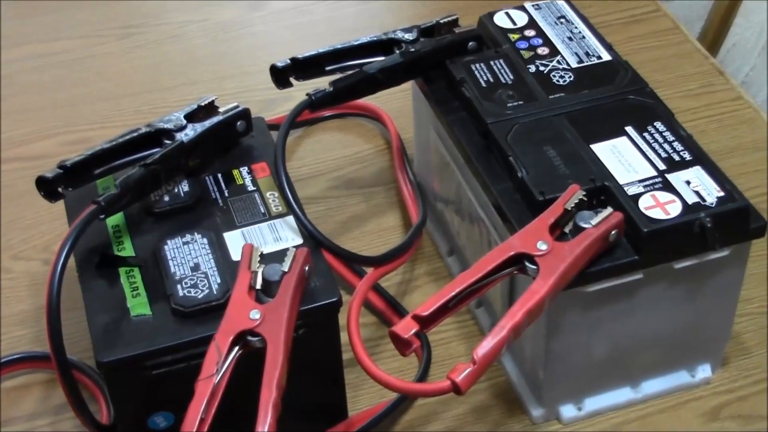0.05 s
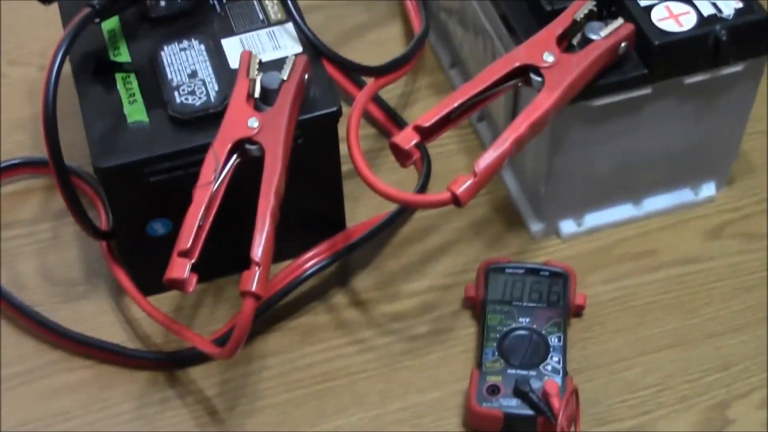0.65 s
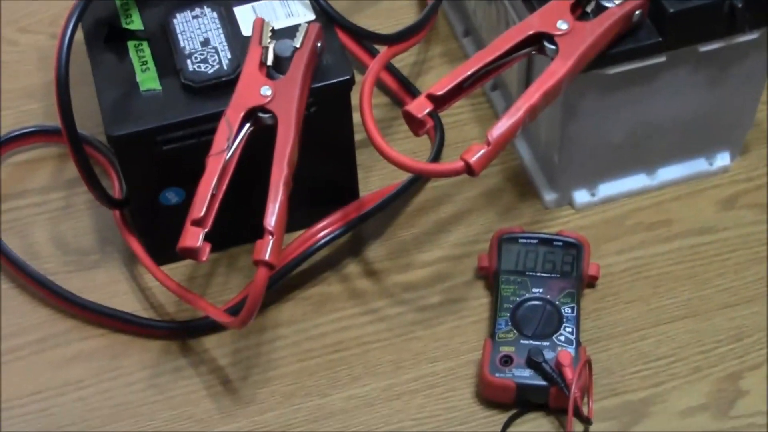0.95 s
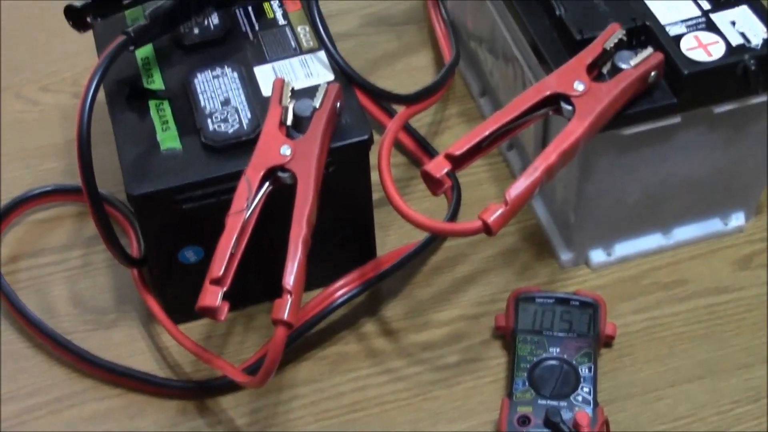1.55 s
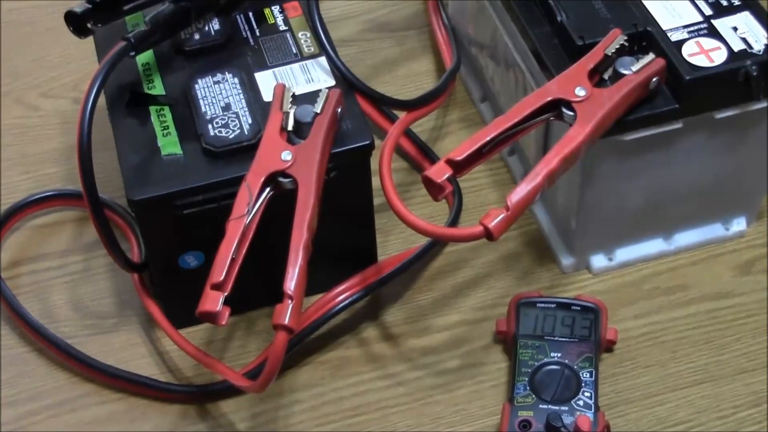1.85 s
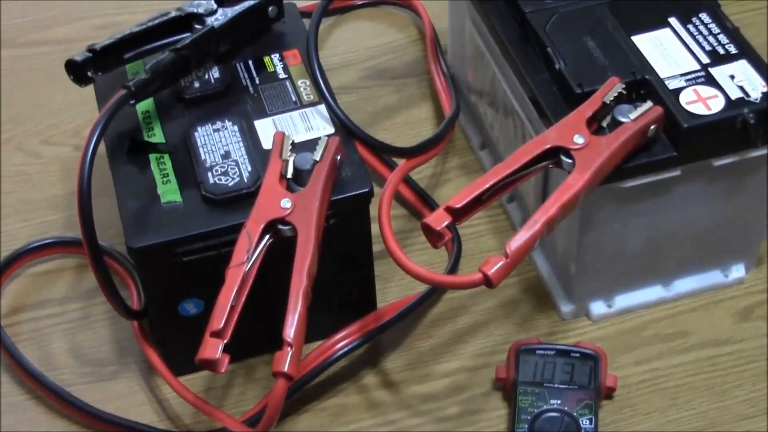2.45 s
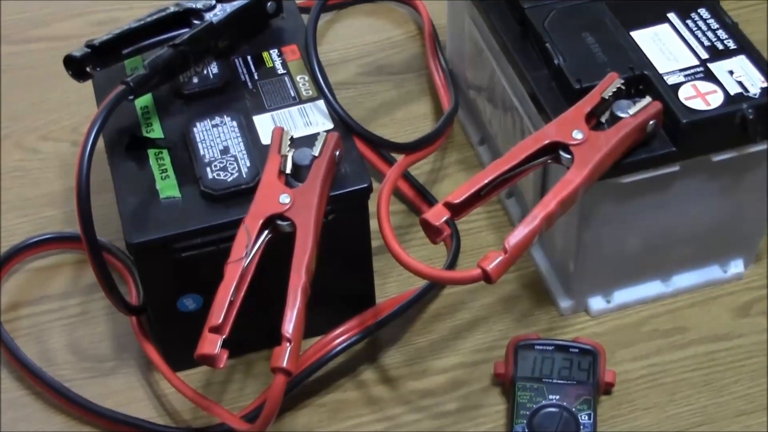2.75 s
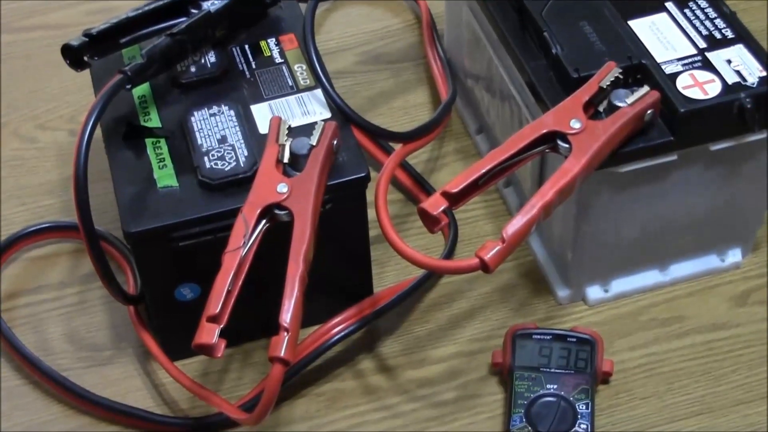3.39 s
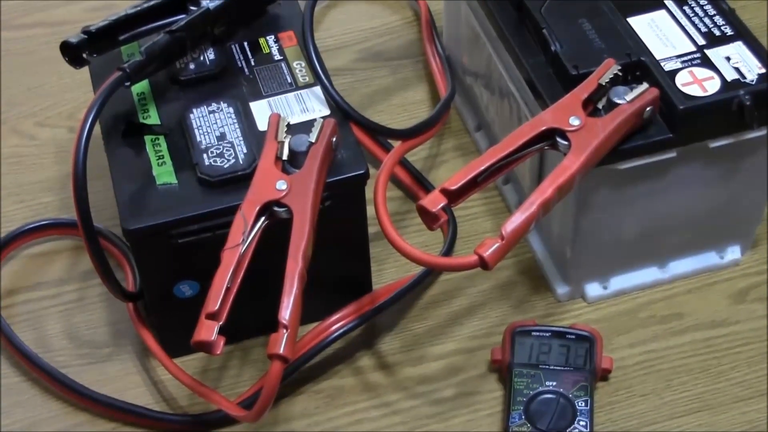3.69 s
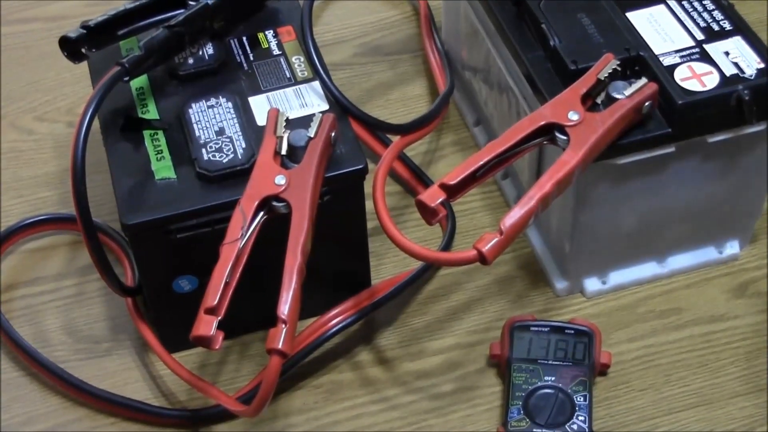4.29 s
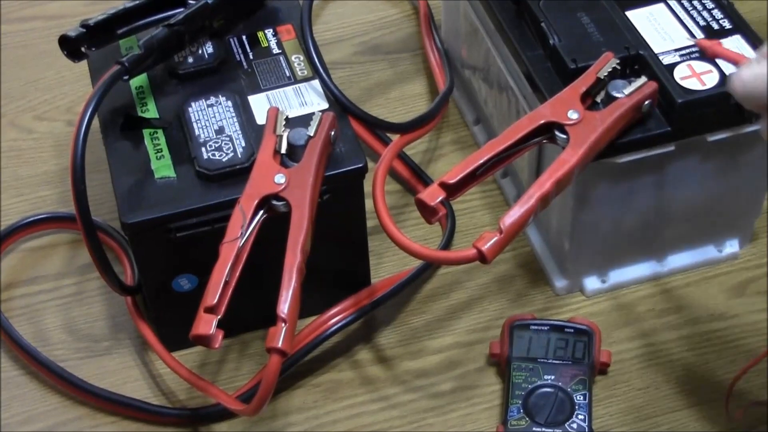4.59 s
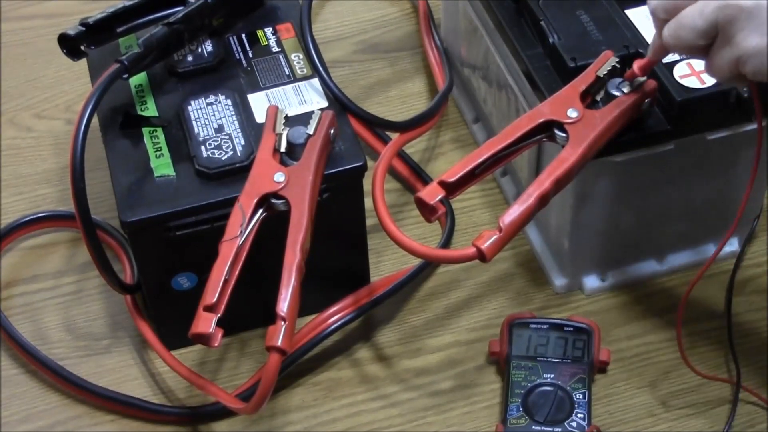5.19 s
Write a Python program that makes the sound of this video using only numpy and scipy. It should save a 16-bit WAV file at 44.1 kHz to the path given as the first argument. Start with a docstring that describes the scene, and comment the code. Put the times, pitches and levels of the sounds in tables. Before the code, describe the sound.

A multimeter clacks on wood amid close plastic knocks, then its test leads softly slide and tick in a small quiet room.

```python
"""A small quiet room, a stereo microphone near a wooden table where a multimeter is handled.
Right at the microphone, the camera's plastic mount sticks and slips in dry knocks as it is aimed.
Farther off, the meter clacks on the wood and sets steel battery clamps ringing faintly.
Then the rubber leads slide, squeak and tick, and a probe tip meets a clamp.
Room air and microphone hiss lie under it all."""
import sys
import numpy as np
from scipy import signal
from scipy.fft import rfft, irfft, next_fast_len
from scipy.io import wavfile
from scipy.ndimage import uniform_filter1d

SR = 44100
rng = np.random.default_rng(int(sys.argv[2]) if len(sys.argv) > 2 else 0)


def transcribe(u):
    """Save the signal u as a 16-bit wav file named by the first command-line argument.

    u: samples, shape (n,) or (channels, n), limited to [-1, 1]; the rate is SR.
    q: integer samples, one column per channel.
    """
    v = np.clip(np.atleast_2d(u).T, -1, 1)
    q = np.round(v * 32767).astype(np.int16)
    wavfile.write(sys.argv[1], SR, q)


N = 239771
TAPS = 4096  # samples in a short impulse response
HZ = np.fft.rfftfreq(TAPS, 1 / SR)


# Dull knocks, right at the microphone. Each row: start in seconds, level in dB, contact corner in Hz.
MOUNT_KNOCKS = [(.0675, -24, 1800), (0.1031, -39, 1070), (0.1795, -30, 810), (.2120, -25.5, 3220),
                (.9980, -15, 2070), (1.0347, -28.5, 960), (1.0615, -42.5, 600), (1.0790, -42.5, 600),
                (1.1466, -28, 1000), (1.2343, -24, 1330), (1.3084, -21, 1430), (1.4200, -25.5, 1030),
                (1.831, -37.5, 780), (2.0364, -41.5, 740), (2.081, -23, 1100), (2.2395, -44, 1300),
                (2.4153, -18.5, 1960), (2.4937, -23, 1220)]
# Thin snaps of plastic. Each row: start in seconds, level in dB, contact corner in Hz, low cut in Hz.
MOUNT_SNAPS = [(0.2432, -28.5, 12100, 6160), (1.4663, -15.5, 5970, 3870), (1.4886, -13.5, 12000, 1060)]
# The mount's distinct modes. Each row: frequency in Hz, relative strength in dB, T60 in seconds.
MOUNT_MODES = [(95.5, -31.5, 0.2), (246, -15.5, 0.064), (376, -26.5, 0.081), (697, -4.5, 0.023),
               (859, -8, 0.024), (1046, -5.5, 0.015), (1390, -6.5, 0.028), (1499, -5.5, 0.042),
               (1672, -5.5, 0.036), (1880, -6, 0.027), (2383, -3.5, 0.025), (2990, 1, 0.0071),
               (3320, 3, 0.0086), (3830, 0.5, 0.028), (4886, 2, 0.015), (5156, -2.5, 0.021),
               (5430, -0.5, 0.0071), (7300, -4, 0.0035), (8700, 2, 0.0059), (9700, -7, 0.017),
               (11200, -9, 0.0084), (5080, -24, 0.17), (3800, -28, 0.19)]
# The colour of its dense modes. Each row: frequency in Hz, relative level in dB.
MOUNT_COLOUR = [(60, 6.5), (200, -1.5), (480, -8), (750, -1.5), (2000, -1), (2700, 1.5), (5000, 1),
                (10000, -3.5), (16000, -14)]

def mount(crack_from_db=-19, crack_width_db=0.45, soft_db=-42, hard_db=-5.5, low_cut_hz=212, room_db=-18):
    """The plastic mount sticks and slips so close to the microphone that the room barely answers."""
    hits = [(s, db, corner_hz, -2, low_hz, room_db)  # treble only 2 dB down
            for s, db, corner_hz, low_hz in MOUNT_SNAPS]
    for s, db, corner_hz in MOUNT_KNOCKS:
        # a strong knock breaks free with a bright crack
        crack = 1 / (1 + np.exp((crack_from_db - db) / crack_width_db))
        snap_db = soft_db + crack * (hard_db - soft_db)
        hits.append((s, db, corner_hz, snap_db, low_cut_hz, room_db))
    return strike(hits, MOUNT_MODES, MOUNT_COLOUR, dense_db=-4)


# Clacks out on the table. Each row: start in seconds, level in dB, contact corner in Hz, room send in dB.
METER_CLACKS = [(0.4491, -33, 5500, -13), (0.4806, -20.5, 7940, 0), (0.4979, -15.5, 3630, -8),
                (0.5088, -12.5, 4050, -8), (0.5125, -21, 1920, -6), (0.5478, -22, 1700, -20),
                (.6135, -37, 4000, -6), (.6190, -11.5, 5640, -6), (1.3424, -14.5, 5800, -7.5),
                (1.5493, -12, 5630, -6.5), (2.5590, -42, 1510, -7)]
# The case's distinct modes. Each row: frequency in Hz, relative strength in dB, T60 in seconds.
METER_MODES = [(230, -9.5, 0.063), (439, -29.5, 0.14), (650, -6.5, 0.043), (963, 1, 0.0076),
               (1161, -7.5, 0.065), (1490, -13, 0.15), (1540, -9, 0.02), (1786, -5.5, 0.033),
               (1912, -7, 0.049), (2330, -2.5, 0.016), (2770, -9, 0.016), (3230, -36, 0.031),
               (5420, -3, 0.01), (6380, 1.5, 0.015), (6950, 0, 0.019), (8700, -14, 0.018)]
# The colour of its dense modes. Each row: frequency in Hz, relative level in dB.
METER_COLOUR = [(50, -0.5), (200, -12), (450, -11), (800, -4.5), (2000, -3), (4000, -4.5), (6800, -2.5),
                (10000, -4.5), (16000, -21)]

def meter(hard_hz=5500, hard_snap_db=-7.5, db_per_octave=11, low_cut_hz=160):
    """The meter's case and plugs hit the wood; hard contacts snap, soft ones thud."""
    hits = []
    for s, db, corner_hz, room_db in METER_CLACKS:
        snap_db = hard_snap_db + db_per_octave * np.log2(corner_hz / hard_hz)
        hits.append((s, db, corner_hz, snap_db, low_cut_hz, room_db))
    return strike(hits, METER_MODES, METER_COLOUR, dense_db=-1)


# Ticks on the table, with plenty of room around them.
# Each row: start in seconds, level in dB, contact corner in Hz, low cut in Hz, room send in dB.
PROBE_TICKS = [(3.1009, -39, 5440, 500, -1), (3.4577, -38.5, 6000, 500, -1.5),
               (4.6173, -35.5, 11000, 300, -7), (4.6686, -43.5, 8000, 400, -5),
               (4.8541, -38, 14000, 7000, -5), (5.1832, -45, 8500, 4000, 1), (5.2635, -21.5, 7040, 200, -4),
               (5.3528, -36.5, 2330, 200, 1.5)]
# A probe's distinct modes. Each row: frequency in Hz, relative strength in dB, T60 in seconds.
PROBE_MODES = [(2126, -11, 0.13), (2750, -2.5, .02), (3070, -2.5, 0.022), (4020, -2.5, 0.017),
               (4790, -4, .025), (5850, 0, 0.014), (6800, -1, .012)]
# The colour of its body. Each row: frequency in Hz, relative level in dB.
PROBE_COLOUR = [(100, -23), (400, -5), (850, -2), (1400, -4.5), (2200, -0.5), (3700, -3), (5600, 0),
                (9000, 0.5), (16000, -12)]

def probes(snap_db=-20):
    """Probe tips and lead ends touch down lightly and ring for a moment."""
    hits = [(s, db, corner_hz, snap_db, low_hz, room_db)
            for s, db, corner_hz, low_hz, room_db in PROBE_TICKS]
    return strike(hits, PROBE_MODES, PROBE_COLOUR, dense_db=5)


# The decay of a body's dense modes, heard close. Each row: frequency in Hz, T60 in seconds.
DENSE_DECAY = [(100, 0.041), (700, 0.06), (1500, 0.053), (5000, 0.024), (16000, 0.019)]
# The decay of the small room. Each row: frequency in Hz, T60 in seconds.
ROOM_DECAY = [(100, 0.72), (400, 0.31), (1200, .33), (3000, 0.38), (7000, 0.34), (11000, 0.25),
              (16000, 0.087)]

def strike(hits, modes, colour, dense_db, build_s=0.012):
    """Blows ring one body's distinct and dense modes; returns (direct sound, room echoes)."""
    direct, room = np.zeros((2, 2, N))
    ring = unit(ringing(modes, TAPS))
    build_up = 1 - np.exp(-(np.arange(3 * TAPS) / SR / build_s) ** 2)
    for s, db, corner_hz, snap_db, low_hz, room_db in hits:
        force = contact(corner_hz, snap_db, low_hz)
        body = ring + gain_of(dense_db) * dense_modes(colour, DENSE_DECAY, TAPS)
        # every blow lands on another spot, so it has echoes of its own
        echoes = dense_modes(colour, ROOM_DECAY, 3 * TAPS) * build_up
        strength = gain_of(db) * np.sqrt(SR / 100)  # the energy of 10 ms at this level
        add(direct, s, strength * unit(through(body, force)))
        add(room, s, strength * gain_of(room_db) * unit(through(echoes, force)))
    return np.array([direct, room])


def contact(corner_hz, snap_db, low_hz):
    """The force of a blow: a soft contact is dull, a snap adds treble, a light touch has no bass."""
    lowpass_power = 1 / (1 + (HZ / corner_hz) ** 5)
    low_cut = HZ / np.hypot(HZ, low_hz)
    return causal(np.sqrt(lowpass_power + gain_of(snap_db) ** 2) * low_cut)


def ringing(modes, size):
    """The distinct modes of a body; successive ones swing in opposite directions."""
    t = np.arange(size) / SR
    return sum((-1) ** k * gain_of(db) * np.exp(-np.log(1000) * t / t60) * np.sin(2 * np.pi * hz * t)
               for k, (hz, db, t60) in enumerate(modes))


# Handling sounds across the two microphone ports. Each row: frequency in Hz, left-right correlation.
HANDLING_LIKENESS = [(100, 0.21), (400, 0.23), (1000, 0.48), (2500, 0.98), (16000, 0.8)]

def dense_modes(colour, decay, size):
    """Countless modes struck at once, each band dying at its own speed."""
    hz, t, bands = signal.stft(noise(colour, HANDLING_LIKENESS, size), SR, nperseg=128)
    bands = bands * np.exp(-np.log(1000) * t / read(decay, hz)[:, None])
    return unit(signal.istft(bands, SR, nperseg=128)[1][:, :size])


# The fading tail of a clack at the very start, then leads drawn over the tabletop.
# Each row: middle in seconds, length in seconds, rub level in dB, swish relative to rub in dB.
TABLE_STROKES = [(0, 0.078, -39.5, -9), (0.453, 0.095, -45, -20), (2.555, 0.083, -42.5, -17),
                 (3.722, 0.21, -43.5, -10), (4.033, .1, -50, -12), (4.293, .3, -51, -4.5),
                 (4.674, 0.4, -44.5, -12), (5.004, 0.43, -53.5, -10.5), (5.35, 0.13, -45.5, -19)]
# The dull rub. Each row: frequency in Hz, relative level in dB.
RUB_COLOUR = [(100, -17), (400, 4), (1000, 0.5), (2200, -0.5), (4000, -9), (7000, -20), (16000, -33)]
# The bright swish. Each row: frequency in Hz, relative level in dB.
SWISH_COLOUR = [(500, -46), (2500, 1), (6500, 10), (11000, 2), (16000, -20)]

def leads(grain_db=1.5):
    """After a clack's tail, rubbery cable catches and slips on the wood, louder as it moves faster."""
    rub = unit(noise(RUB_COLOUR, HANDLING_LIKENESS, N))
    swish = unit(noise(SWISH_COLOUR, HANDLING_LIKENESS, N))
    strokes = sum(gain_of(db) * arch(middle_s, length_s) * (rub + gain_of(swish_db) * swish)
                  for middle_s, length_s, db, swish_db in TABLE_STROKES)
    return strokes * np.sqrt(N) * gain_of(grain_db * flutter(200))


def squeak(base_hz=4950, rise_hz=480, level_db=-58, waver=0.0065):
    """A rubber lead briefly sings as it slips, higher and louder with speed."""
    speed = arch(middle_s=4.205, length_s=0.09)
    pitch_hz = (base_hz + rise_hz * speed) * (1 + waver * flutter(120))
    return gain_of(level_db) * speed * np.sin(2 * np.pi * np.cumsum(pitch_hz) / SR)


def arch(middle_s, length_s):
    """One smooth swell: from rest up to 1 and back to rest."""
    return np.cos(np.pi * np.clip((np.arange(N) / SR - middle_s) / length_s, -.5, .5))


# Steel clamps, faint behind the meter. Each row: frequency in Hz, coupling in dB, T60 in seconds.
CLAMP_MODES = [(2410, -58, 0.26), (3060, -62, .14), (3890, -52, 0.2)]

def clamps(clacks):
    """The meter's clacks set the battery clamps ringing."""
    return through(clacks.mean(0), ringing(CLAMP_MODES, 4 * TAPS))[:, :N]


# The room as heard from the microphone. Each row: frequency in Hz, gain in dB.
ROOM_GAIN = [(45, -5.5), (80, 10.5), (125, 4), (250, 11.5), (700, 2), (1800, -1), (4000, -2.5), (8000, -4),
             (12000, -4), (16000, 2)]

def small_room(echoes):
    """The room returns the echoes with their bass lifted."""
    return through(echoes, causal(gain_of(read(ROOM_GAIN, HZ))))[:, :N]


# The noise floor at the microphone. Each row: frequency in Hz, relative level in dB.
HISS_COLOUR = [(12, -9), (20, -0.5), (123, -4.5), (142, -3.5), (204, -5.5), (262, -7.5), (293, -1),
               (377, -5.5), (410, -6), (513, -8.5), (558, -10.5), (923, -14.5), (1570, -16.5),
               (7730, -27.5), (16000, -34.5)]
# Its slow drift. Each row: time in seconds, level in dB.
HISS_LEVEL = [(0, -44.5), (.45, -45), (.9, -47), (1.85, -49), (4.6, -42.5), (5.44, -41.5)]
# Its likeness at the two ports. Each row: frequency in Hz, left-right correlation.
HISS_LIKENESS = [(60, -0.014), (150, 0.0084), (380, -0.035), (950, 0.11), (2380, 0.47), (5980, 0.39),
                 (15000, 0.25)]

def hiss(balance_db=0.35):
    """Room air and microphone hiss, sinking during the clatter and slowly coming back."""
    level_db = np.interp(np.arange(N) / SR, *np.transpose(HISS_LEVEL))
    air = unit(noise(HISS_COLOUR, HISS_LIKENESS, N)) * np.sqrt(N)
    return air * gain_of(level_db + np.array([[-balance_db], [balance_db]]))


# Cavities behind the right microphone port. Each row: frequency in Hz, width in Hz, strength in dB.
PORT_CAVITIES = [(384, 61, 0.5), (607, 38, -2.5), (1775, 117, 3.5)]

def microphone_ports(x, left_db=-1.0, right_db=-0.2, lead_rad=0.56):
    """The right port's cavities ring on top of the sound, a little ahead in phase."""
    t = np.arange(TAPS) / SR
    cavities = np.zeros(TAPS)
    for hz, width, db in PORT_CAVITIES:
        decay = 2 * np.pi * width / SR * np.exp(-np.pi * width * t)
        cavities += gain_of(db) * decay * np.cos(2 * np.pi * hz * t + lead_rad)
    right = x[1] + through(x[1], cavities)[0, :N]
    return np.array([gain_of(left_db) * x[0], gain_of(right_db) * right])


def noise(colour, likeness, size):
    """Coloured noise at two close ports: more alike in the treble than in the bass."""
    length = next_fast_len(size, real=True)
    hz = np.fft.rfftfreq(length, 1 / SR)
    mid, side = rfft(rng.standard_normal((2, length)))
    same = np.sqrt(np.clip(read(likeness, hz), 0, 1))
    mid, side = mid * np.sqrt(1 + same), side * np.sqrt(1 - same)
    return irfft(np.array([mid + side, mid - side]) * gain_of(read(colour, hz)), length)[:, :size]


def flutter(samples):
    """A random wobble of rms 1, smoothed over this many samples."""
    return unit(uniform_filter1d(rng.standard_normal(N), size=samples)) * np.sqrt(N)


def gain_of(db):
    """Decibels to amplitude."""
    return 10 ** (np.asarray(db) / 20)


def read(points, hz):
    """A table joined by lines over log frequency."""
    f, value = np.transpose(points)
    return np.interp(np.log(hz + 1), np.log(f + 1), value)


def unit(x):
    """Scales a sound to energy 1 per channel."""
    return x / np.sqrt(np.mean(np.sum(x ** 2, -1)) + 1e-20)


def add(mix, s, sound):
    """Lays a sound into the mix at s seconds."""
    part = mix[:, max(round(s * SR), 0):][:, :sound.shape[-1]]
    part += sound[..., :part.shape[-1]]


def causal(gain):
    """The minimum-phase impulse response with this gain over HZ."""
    log_gain = np.log(np.maximum(gain, 1e-5))
    mirrored = np.concatenate([log_gain, log_gain[-2:0:-1]])
    return np.fft.ifft(np.exp(np.conj(signal.hilbert(mirrored)))).real


def through(x, response):
    """Convolves channel by channel."""
    return signal.fftconvolve(np.atleast_2d(x), np.atleast_2d(response), axes=1)


def scene():
    """Blows reach the microphone directly and by the room, over sliding leads and hiss."""
    clacks = meter()
    direct, echoes = clacks + probes() + mount()
    blows = direct + small_room(echoes) + clamps(clacks[0])
    return microphone_ports(blows) + leads() + squeak() + hiss()


def record(dry, edge_hz=16400):
    """The recorder rounds off peaks at full scale, then cuts the highest treble."""
    rounded = dry / (1 + dry ** 6) ** (1 / 6)
    lowpass = signal.firwin(255, edge_hz, window=("kaiser", 9), fs=SR)
    return signal.oaconvolve(rounded, lowpass[None], "same")


dry = scene()
out = record(dry)
transcribe(out)
```